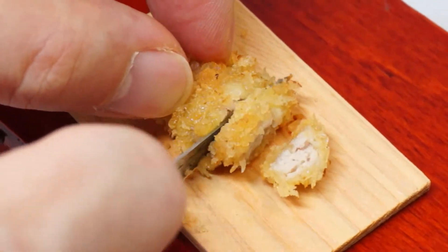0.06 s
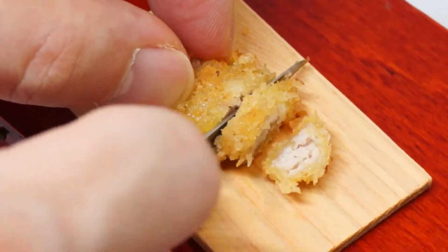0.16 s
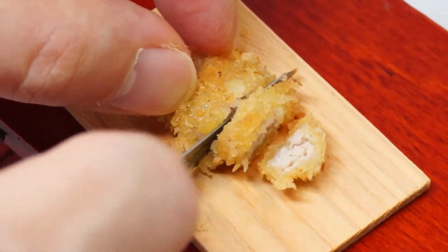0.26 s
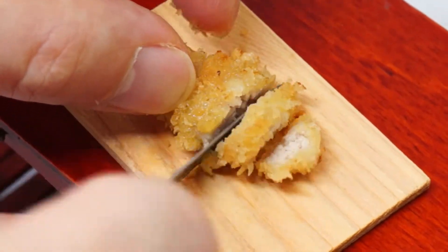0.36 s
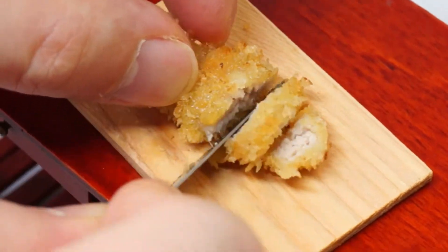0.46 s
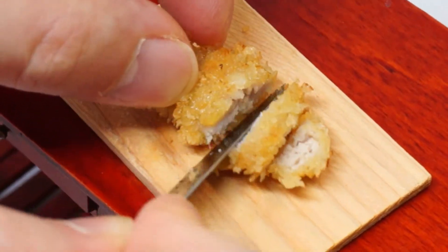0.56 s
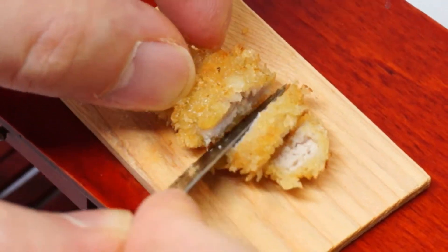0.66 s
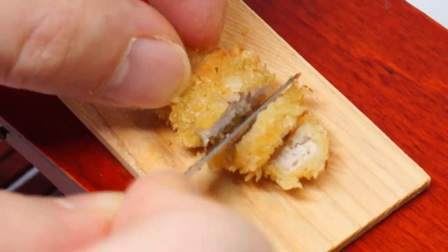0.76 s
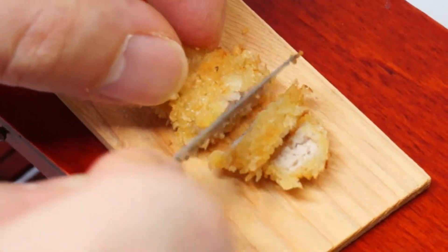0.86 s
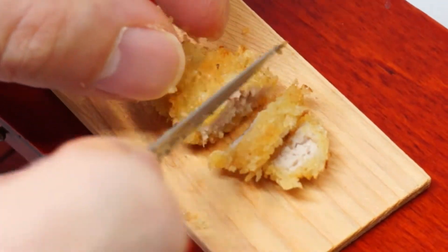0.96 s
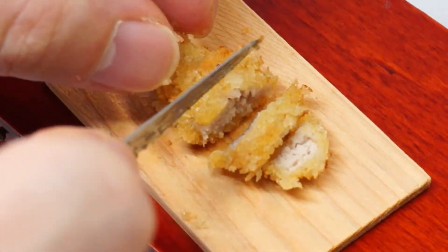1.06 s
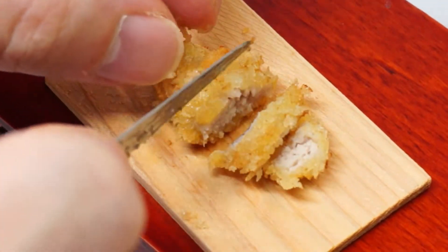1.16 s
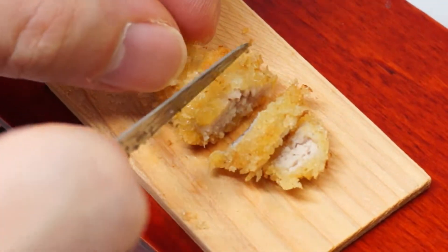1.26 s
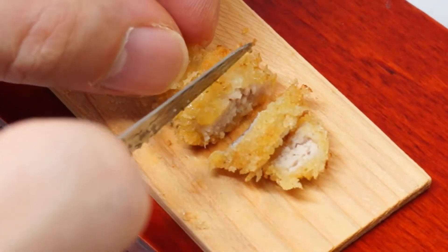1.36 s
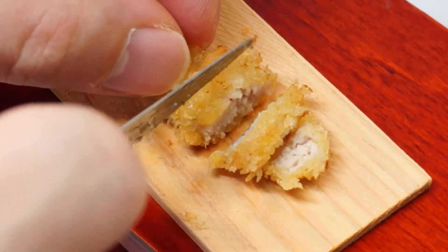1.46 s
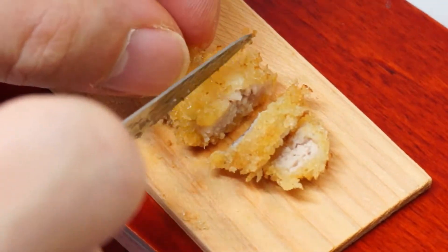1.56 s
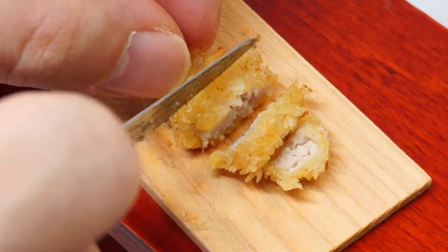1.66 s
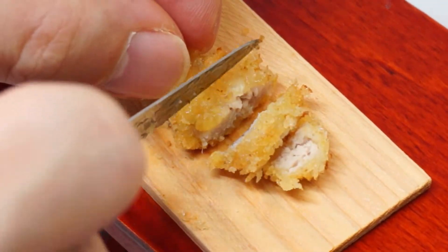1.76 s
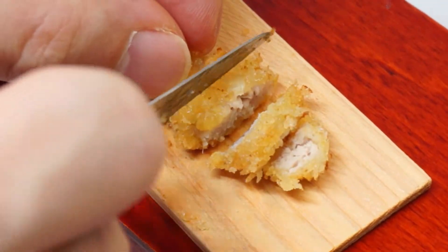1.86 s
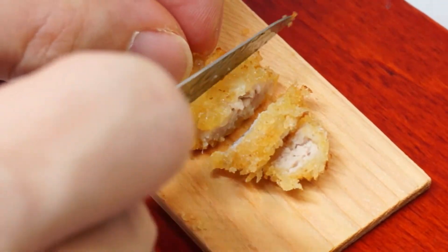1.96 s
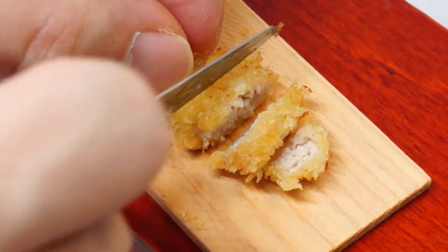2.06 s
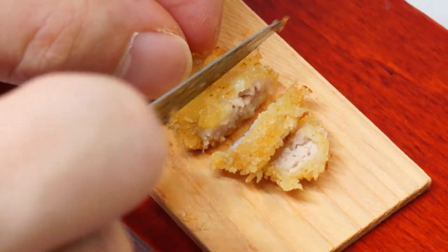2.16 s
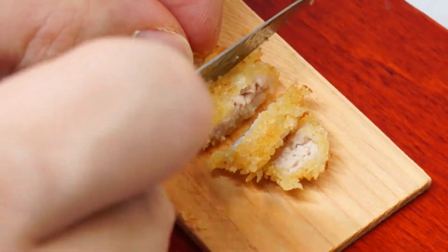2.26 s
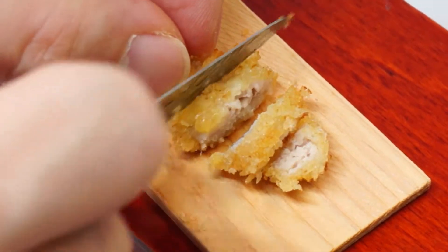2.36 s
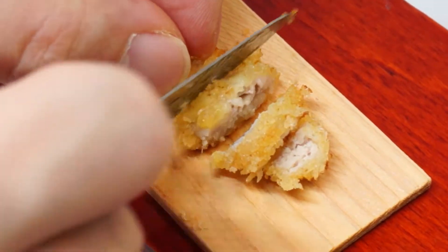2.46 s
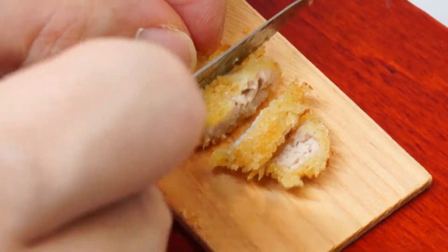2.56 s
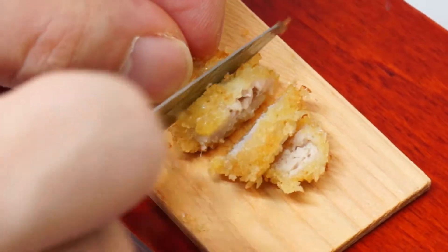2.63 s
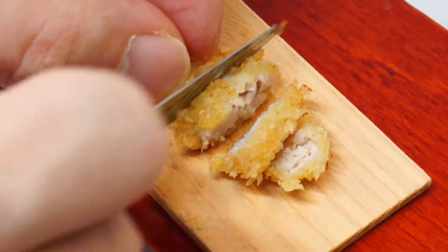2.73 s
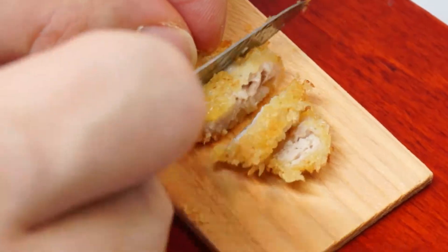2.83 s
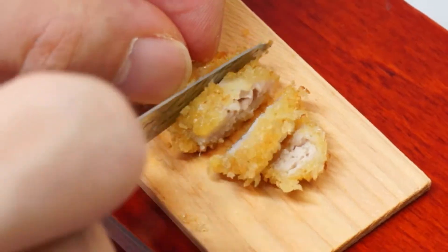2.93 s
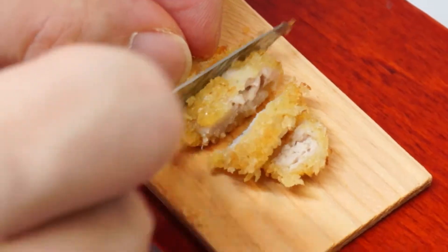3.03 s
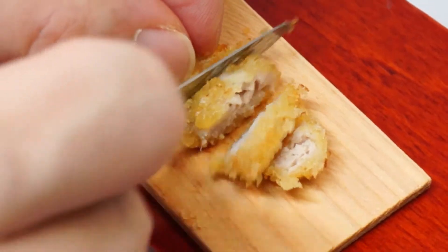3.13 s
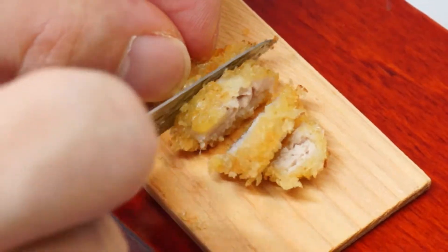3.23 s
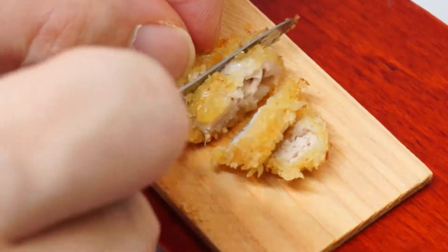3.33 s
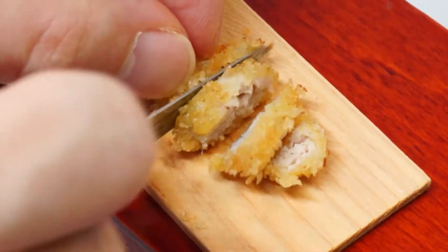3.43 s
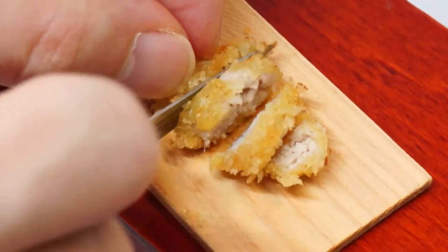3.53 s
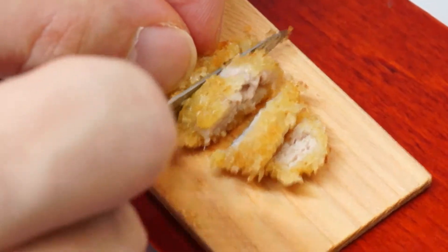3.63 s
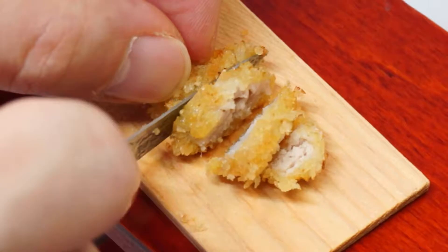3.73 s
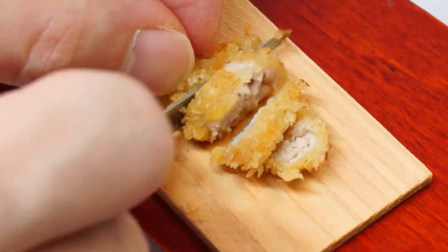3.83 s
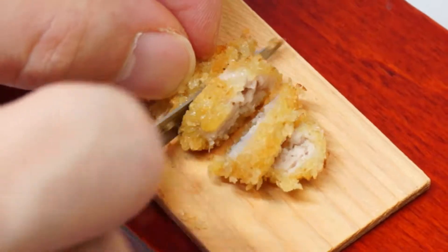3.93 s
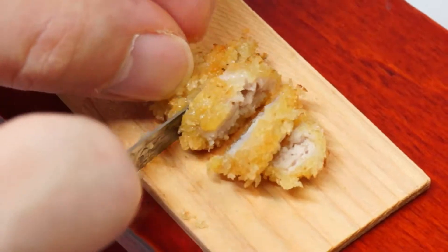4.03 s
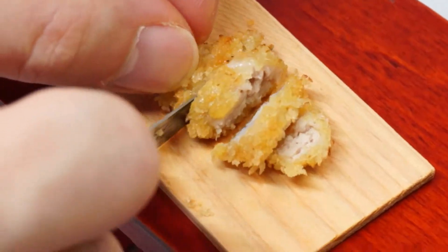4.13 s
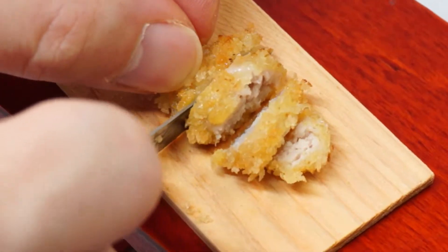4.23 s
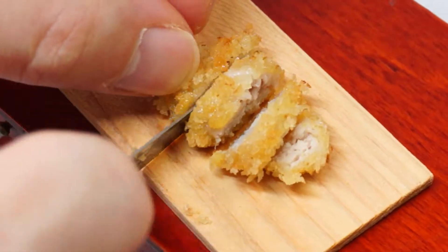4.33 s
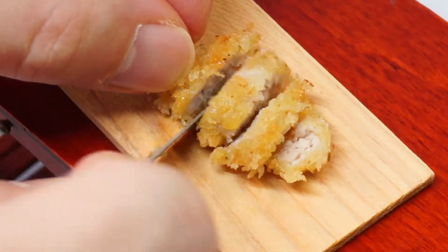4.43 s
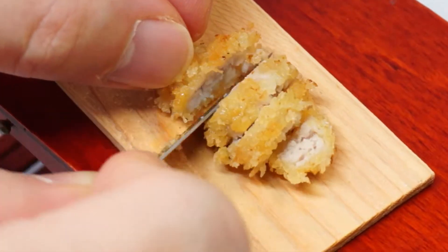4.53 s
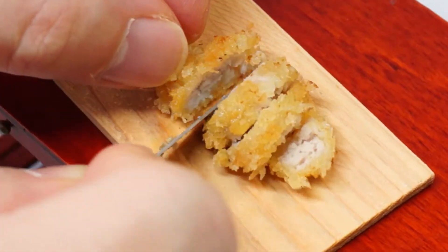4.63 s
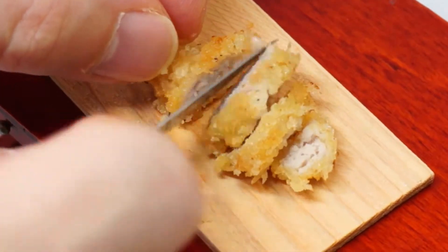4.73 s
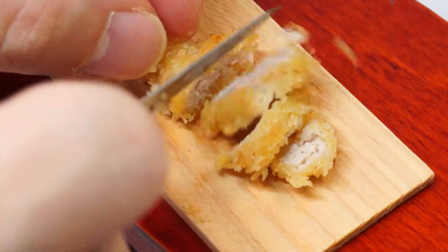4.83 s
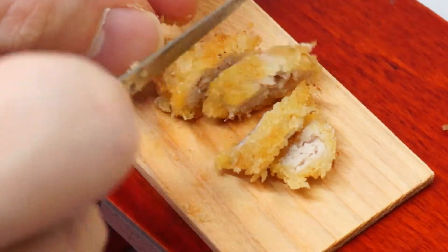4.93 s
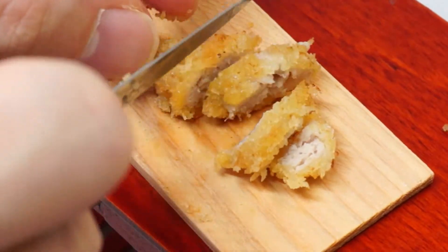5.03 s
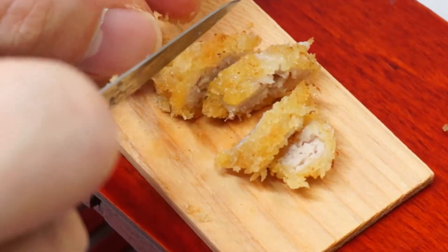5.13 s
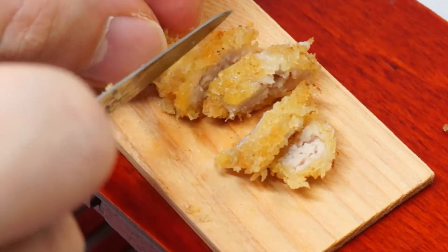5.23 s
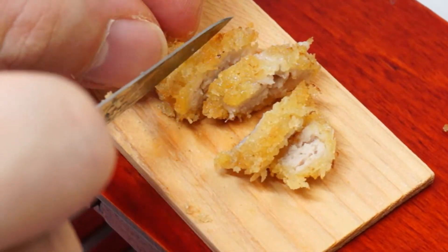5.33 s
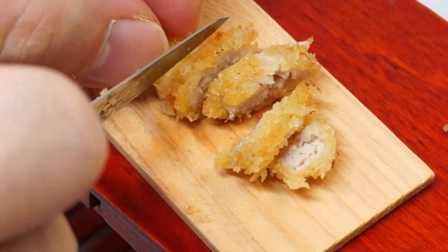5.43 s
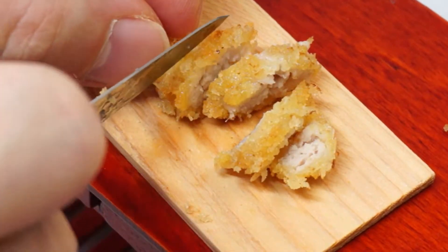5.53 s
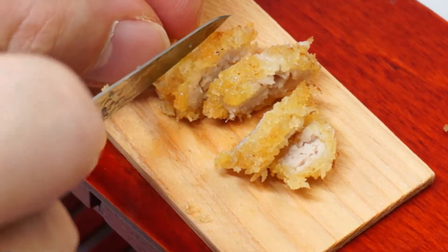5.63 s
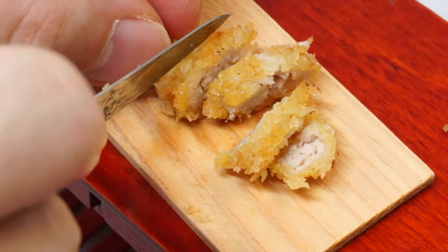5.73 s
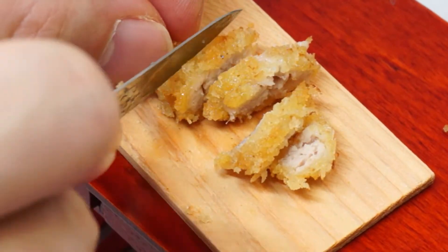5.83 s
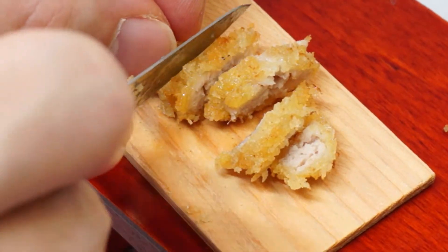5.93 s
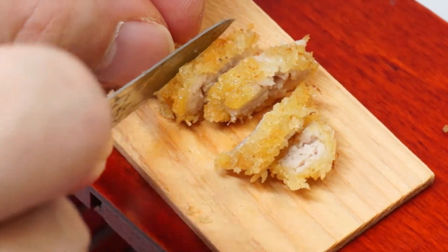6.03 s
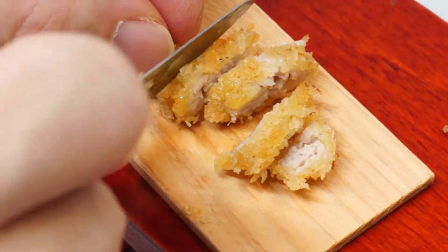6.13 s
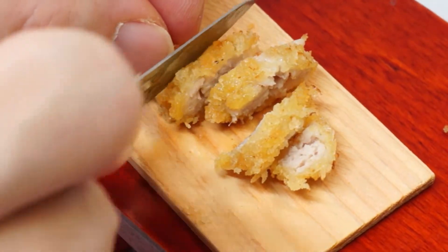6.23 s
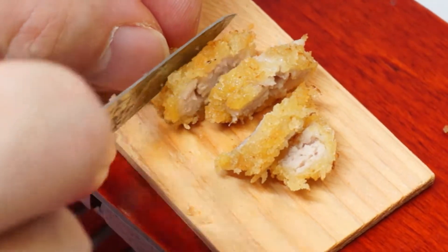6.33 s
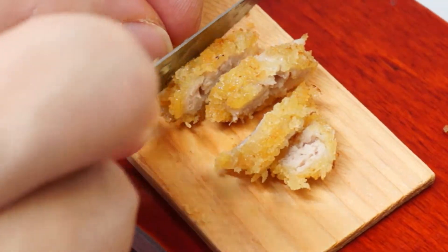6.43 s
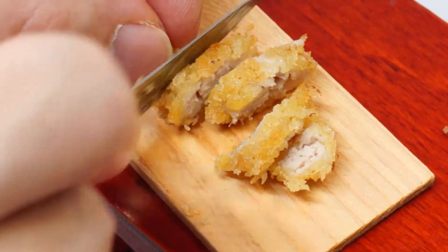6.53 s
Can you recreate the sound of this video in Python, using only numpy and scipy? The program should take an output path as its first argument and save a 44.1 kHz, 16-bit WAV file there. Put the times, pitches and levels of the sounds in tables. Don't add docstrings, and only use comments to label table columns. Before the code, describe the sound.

A crisp crunch, then a tiny knife saws through a brittle fried crust with crackles, flaky ticks and dull wooden board knocks over a quiet room hum.

```python
import sys
import numpy as np
from scipy import signal
from scipy.fft import rfft, irfft
from scipy.io import wavfile
from scipy.ndimage import uniform_filter1d

SR = 44100
rng = np.random.default_rng(int(sys.argv[2]) if len(sys.argv) > 2 else 0)


def magnitude_from_level(level_db):
    exponent = np.asarray(level_db, float) / 20
    return 10 ** exponent


def waveform_to_disk(signal):
    frames = np.transpose(np.atleast_2d(signal))
    scaled = np.clip(frames, -1, 1) * 32767
    samples = np.round(scaled).astype(np.int16)
    wavfile.write(sys.argv[1], SR, samples)


N = 290178

# (frequency [Hz], level [dB], t60 [s])
TABLE_MODES = [(138.2, -8, 0.14), (165, -6.5, 0.064), (205, -6.5, 0.1), (312, -8, 0.039)]
# (frequency [Hz], level [dB], t60 [s])
BOARD_MODES = [(342, 9, 0.027), (498.5, 9.5, 0.017), (568, 7, 0.013), (735, -1, 0.03), (865, 2.5, 0.027),
               (1060, -4.5, 0.0091), (1444, -1, 0.013), (1736, -8, 0.023), (2046, -10.5, 0.022),
               (2760, -15, 0.014), (3600, -8.5, 0.033)]
# (frequency [Hz], side minus mid [dB])
STEREO_WIDTH = [(60, -30), (110, -12.5), (200, -15), (380, -1.5), (700, -2.5), (1290, -0.5), (2380, -2),
                (4400, -5), (8120, -18), (15000, -76)]
# (time [s], length [s], flake level [dB], crumb level [dB re flakes])
BITE_RUNS = [(.272, .016, -41.5, -2.5), (0.362, .025, -46.5, -5), (1.889, 0.0025, -43, -16),
             (2.001, 0.053, -52, -7), (2.212, .05, -44.5, -6), (2.309, .06, -45, -6),
             (2.481, .038, -46, -12), (2.558, .024, -42, -9), (2.628, .006, -42, -8),
             (2.69, .018, -45.5, -3), (2.853, .025, -47, -8), (2.963, .022, -39.5, -4),
             (3.055, 0.0051, -39, 0.5), (3.31, .035, -55, -21), (3.376, .034, -47.5, -9),
             (3.491, .06, -51, -17), (3.879, 0.1, -41, -19), (3.964, .018, -39, -3),
             (4.055, .006, -47, -11), (4.125, .006, -46, 0), (4.249, .015, -54, -1),
             (4.528, 0.025, -40.5, -6.5), (4.597, .01, -50, -12), (4.736, .003, -50, -10),
             (4.9, .02, -53, -5), (5.37, .003, -48, -2), (5.715, .035, -53.5, -2),
             (5.931, .003, -38.5, -8.5), (6.416, 0.041, -44.5, -8), (6.467, .006, -40.5, -2)]
# (time [s], level [dB], hardness [dB rel], rebound delay [s], rebound level [dB])
BOARD_STROKES = [
    (2.902, -18, -11, 0.072, -24),
    (3.17, -20, -7, 0.078, -25),
    (3.406, -20.5, -7.5, .088, -25.5),
    (3.692, -26, -5.5, .068, -26.5),
    (3.950, -26.5, -8, .073, -24),
    (4.193, -21, -7, .04, -30),
]


def level(x, db):
    return x * magnitude_from_level(db) / np.sqrt(np.mean(x ** 2))


def peak(x, hz, width):
    return signal.lfilter(*signal.iirpeak(hz, hz / width, fs=SR), x)


def body(x, peaks):
    return sum((-1) ** k * magnitude_from_level(db) * peak(x, hz, width) for k, (hz, width, db) in enumerate(peaks))


def ring(x, hz, t60):
    pole = np.exp(2j * np.pi * hz / SR - np.log(1000) / (t60 * SR))
    return signal.lfilter([1], [1, -pole], x).imag


def colour(x, points):
    hz, db = np.transpose(points)
    f = np.maximum(np.fft.rfftfreq(N, 1 / SR), 1)
    return irfft(rfft(x) * magnitude_from_level(np.interp(np.log(f), np.log(hz), db)), N)


def walk(rate):
    k = int(SR / rate)
    held = np.repeat(rng.standard_normal(N // k + 1), k)
    return uniform_filter1d(uniform_filter1d(held, k), k)[:N]


def add(out, s, x):
    i = int(s * SR)
    out[i:i + len(x)] += x[:N - i]


def background():
    # (frequency [Hz], level [dB rms])
    motor_lines = [(301.5, -60.5), (398.4, -60.5), (441.4, -46.5), (489.9, -88), (597.5, -70), (899.0, -75),
                   (1669, -75.5), (3483, -76.5), (3725, -81.5), (5276, -93)]
    # (frequency [Hz], density [dB per Hz])
    air_spectrum = [(20, -8), (60, -17.5), (150, -4.5), (300, -8.5), (357, -13.5), (434, -9.5), (542, -15),
                    (900, -24), (1220, -29.5), (1910, -34), (4180, -38), (9000, -38), (16000, -38),
                    (20000, -65)]
    # (frequency [Hz], width [Hz], level [dB rms])
    fan_bands = [(52.8, 15, -61), (3530, 590, -75), (1580, 250, -80), (5300, 99, -79)]
    t = np.arange(N) / SR
    mid = level(colour(rng.standard_normal(N), air_spectrum), -51.5) * magnitude_from_level(2.5 * walk(3.38))
    for hz, width, db in fan_bands:
        mid = mid + level(peak(peak(rng.standard_normal(N), hz, width), hz, width), db)
    side = colour(np.roll(mid, N // 3), STEREO_WIDTH)
    for hz, db in motor_lines:
        waver = np.cumsum(walk(6)) / SR * 0.001933 * hz
        tone = np.sin(2 * np.pi * (hz * t + waver + rng.random()))
        mid = mid + np.sqrt(2) * magnitude_from_level(db + 0.21 * walk(14)) * tone
    return np.array([mid + side, mid - side])


def room(x):
    t60_s, onset_s, room_db = 0.3, 0.00082, -16
    t = np.arange(SR // 2) / SR
    tails = rng.standard_normal((2, len(t))) * magnitude_from_level(-60 * t / t60_s) * np.minimum(t / onset_s, 1)
    mid, side = (signal.fftconvolve(x, tail / np.sqrt(np.sum(tail ** 2)))[:N] for tail in tails)
    side = magnitude_from_level(8.5) * colour(side, STEREO_WIDTH)
    return magnitude_from_level(room_db) * np.array([mid + side, mid - side])


def rumble(db):
    shake = rng.standard_normal(N) * magnitude_from_level(3 * walk(30))
    table, board = (sum(magnitude_from_level(d) * ring(shake, f, t) for f, d, t in modes)
                    for modes in (TABLE_MODES, BOARD_MODES))
    return (level(table, -5.5) + level(board, -12.5)) * magnitude_from_level(db)


def blows():
    # (time [s], peak level [dB], hardness [dB rel], favoured table pitch [Hz])
    board_nudges = [(.025, -29.5, -14, 176), (.213, -23, -18, 148), (.278, -31.5, -21, 143),
                    (0.346, -31, -14.5, 199), (.394, -42, -21, 143), (.467, -28.5, -36.5, 140),
                    (0.586, -28.5, -18.5, 324), (.809, -35.5, -15.5, 143), (1.442, -34.5, -38, 152),
                    (1.577, -27, -22, 165), (1.887, -37, -34, 144), (2.232, -36.5, -26, 129),
                    (2.336, -32, -14.5, 328), (2.587, -30.5, -19, 288), (2.617, -29.5, -19, 186),
                    (2.696, -28, -18, 133), (2.853, -34, -22, 208), (3.858, -29, -21, 146),
                    (4.108, -32, -11.5, 205), (4.736, -42.5, -4, 322), (5.39, -35, -25.5, 160),
                    (5.696, -31.5, -17, 154), (5.845, -30.5, -18, 206), (5.932, -30.5, -17.5, 136),
                    (6.454, -30.5, -29, 198)]
    strokes = [(s, db, hard_db, 176.5) for s, db, hard_db, *_ in BOARD_STROKES]
    rebounds = [(s + after, db, -13.5, 158) for s, *_, after, db in BOARD_STROKES]
    return strokes + rebounds + list(board_nudges)


def knocks():
    lag_cycles, board_lag_s = 0.45, 0.00298
    chatter_db, chatter_t60_s = -33.5, 0.22
    out, silence, time = np.zeros(N), np.zeros(8192), np.arange(8192) / SR
    push, edge = (np.r_[w / w.sum(), silence][:8192] for w in (np.hanning(60), np.hanning(9)))
    for s, db, hard_db, hz in blows():
        weight = magnitude_from_level(1.5 * rng.standard_normal(16))
        detune = 1 + .025 * rng.standard_normal(16)
        rattle = uniform_filter1d(rng.standard_normal(8192), size=10)
        chatter = rattle * magnitude_from_level(chatter_db - 60 * time / chatter_t60_s)
        table_push = push + 0.55 * chatter
        for k, (f, d, t) in enumerate(TABLE_MODES):
            favour_db = 5 * np.exp(-(np.log(f / hz) / 0.18) ** 2)
            gain = magnitude_from_level(db + d + favour_db + 1.0) * weight[k]
            add(out, s + lag_cycles / f, gain * ring(table_push, f, t))
        board_blow = magnitude_from_level(min(hard_db + 9, 0)) * edge + magnitude_from_level(1.5) * chatter
        for k, (f, d, t) in enumerate(BOARD_MODES):
            gain = (-1) ** k * magnitude_from_level(db + hard_db + d - 1.0) * weight[k + 5]
            add(out, s + board_lag_s + lag_cycles / f, gain * ring(board_blow, f * detune[k], t))
    return out


def slides():
    # (time [s], length [s], frequency [Hz], width [Hz], level [dB])
    blade_rubs = [
        (.217, .03, 1450, 600, -53),
        (.351, .055, 1200, 900, -58.5),
        (.017, .041, 1200, 195, -54),
        (2.71, .088, 12200, 3000, -56),
        (5.842, .0087, 5550, 500, -47),
    ]
    out = np.zeros(N)
    for s, length, hz, width, db in blade_rubs:
        swell = np.hanning(int(length * SR))
        hiss = peak(peak(rng.standard_normal(len(swell)), hz, width), hz, width)
        add(out, s, level(hiss, db) * swell)
    return out


def grind_db(saw_db):
    bite_db, tail_s = -15.5, 0.025
    power = magnitude_from_level(2 * saw_db)
    for s, length, db, _ in BITE_RUNS:
        add(power, s, magnitude_from_level(2 * (db + bite_db)) * np.hanning(int((length + tail_s) * SR)))
    return 10 * np.log10(power)


def swarm(db, rate=1500, spread_db=2.5):
    size_db = spread_db * rng.exponential(size=N) + 2 * walk(45)
    hits = (rng.random(N) < rate / SR) * magnitude_from_level(size_db)
    decay = magnitude_from_level(-60 / (0.012 * SR))
    shower = signal.lfilter([1], [1, -decay], hits ** 2) ** .5
    return level(shower * rng.standard_normal(N), 0) * magnitude_from_level(db)


def fracture(t60, settle_db, settle_t60):
    t = np.arange(4096) / SR
    x = rng.standard_normal(4096) * (magnitude_from_level(-60 * t / t60) + magnitude_from_level(settle_db - 60 * t / settle_t60))
    x[0] = 8.5
    return x


def breaks():
    # (time [s], thick crumb level [dB], thin flake level [dB], flake pitch [Hz])
    crust_cracks = [(.03, -33.5, -21, 9300), (2.101, -50, -34, 11500), (2.2243, -34, -42, 5600),
                    (2.3274, -46, -34, 11600), (2.336, -49, -34, 9900), (2.4915, -46, -39, 8750),
                    (2.5801, -45, -39, 8400), (2.6195, -33, -36.5, 9030), (2.6933, -39, -53, 5300),
                    (2.8894, -42, -42, 9600), (2.9836, -38, -34, 15200), (3.195, -31, -25, 11100),
                    (3.2195, -37.5, -50.5, 6700), (3.4188, -39, -34.5, 11700), (3.4419, -43, -37, 10900),
                    (3.4506, -43, -33, 8300), (2.8804, -58, -40, 9800), (3.9487, -44, -28.5, 11700),
                    (3.9714, -41.5, -37, 9900), (4.0117, -33, -29, 11700), (4.019, -34, -25.5, 11700),
                    (4.0735, -35, -34, 8160), (4.0892, -29.5, -36, 9100), (4.097, -34, -38, 13400),
                    (4.1062, -25, -31.5, 8400), (5.3966, -41, -37.5, 11400), (5.9555, -36, -30.5, 15800),
                    (6.38, -42.5, -36, 7600), (6.4092, -38.5, -31.5, 8730), (6.45, -39.5, -37, 9000)]
    # (time [s], level [dB], pitch [Hz])
    flake_ticks = [(0.34, -46, 10100), (.6726, -46.5, 11700), (.707, -45, 8800), (0.7608, -43, 8600),
                   (0.8065, -49.5, 12900), (1.4438, -46, 13400), (1.5315, -41, 10840), (1.5772, -47, 11700),
                   (1.6878, -43, 13900), (2.923, -44.5, 11700), (3.292, -43, 14300), (3.351, -48, 15300),
                   (3.6684, -47, 14400), (3.7594, -46, 11300), (3.8322, -44, 8400), (4.2138, -40.5, 8500),
                   (4.3437, -48.5, 14100), (4.507, -43, 8250), (2.0555, -43, 7500), (4.74, -44.5, 8700),
                   (4.8157, -50.5, 7760), (5.6142, -48, 12600), (5.7, -40.5, 5300), (5.8448, -42, 5670),
                   (6.0524, -39, 5870), (6.1717, -45, 8750), (6.2314, -38, 7460), (6.2913, -46, 8950),
                   (6.3269, -42.5, 10800), (6.5303, -47, 8860)]
    stray_times = [4.7036, .433, .52, .621, .9004, 1.596, 1.6704, 1.7601, 1.8417, 1.9449, 2.424, 2.7689,
                   3.0476, 3.2455, 3.64, 3.71, 4.637, 4.7615, 4.995, 4.522, 5.34, 5.81, 5.88, 5.91, 6.0063,
                   6.0677, 6.1255, 6.2523, 6.51]
    crumb_db, crumb_db_per_octave = -6, -3.5
    edge_lag_s, edge_db = .0035, -26
    stray_db, stray_hz = -55.5, 11500
    gap_s, scatter_db, flake_hz, flake_spread = .009, 3.5, 10800, .22
    rows = list(crust_cracks)
    for s, db, hz in flake_ticks:
        rows.append((s, db + crumb_db + crumb_db_per_octave * np.log2(hz / 5500), db, hz))
    rows += [(s + edge_lag_s, db + edge_db, db + edge_db - 2, 5700) for s, db, *_ in BOARD_STROKES]
    rows += [(s, stray_db + 2 * crumb_db, stray_db, stray_hz) for s in stray_times]
    for s, length, db, bite_crumb_db in BITE_RUNS:
        gap = gap_s * (.4 + 1.2 * rng.random(10))
        chance = rng.standard_normal((3, 10))
        after = np.cumsum(gap) - gap[0]
        size_db = db - 2.5 + scatter_db * chance[0] - 1e4 * np.maximum(after - length, 0)
        hz = np.minimum(flake_hz * np.exp(flake_spread * chance[2]), 15500)
        rows += zip(s + after, size_db + bite_crumb_db + scatter_db * chance[1], size_db, hz)
    return rows


def snaps():
    settle_db = -20
    thick, thin = np.zeros(N), np.zeros(N)
    for s, thick_db, thin_db, hz in breaks():
        add(thick, s, magnitude_from_level(thick_db) * fracture(t60=.02, settle_db=settle_db, settle_t60=.2))
        flake = fracture(t60=.011, settle_db=settle_db, settle_t60=.18)
        add(thin, s, magnitude_from_level(thin_db) * (flake + 2.2 * peak(flake, hz, 1500)))
    return magnitude_from_level(-1.0) * thick, magnitude_from_level(-3.5) * thin


def scene():
    # (time [s], fine crackle level [dB], table rumble level [dB])
    saw_course = [(0, -51, -39.5), (.16, -62.5, -44.5), (.6, -68.5, -46), (1.3, -80, -62),
                  (2.0, -73, -54.5), (2.42, -63, -51), (2.67, -64, -47), (3.08, -64, -43.5),
                  (3.24, -55, -37.5), (3.36, -66.5, -47), (3.8, -65, -41), (4.1, -51, -40),
                  (4.2, -63, -39.5), (4.62, -66.5, -48), (4.82, -71, -53), (5.75, -74, -53),
                  (5.95, -66.5, -52.5), (6.58, -59.5, -43.5)]
    # (frequency [Hz], width [Hz], level [dB])
    thick_modes = [(2815, 264, 5.5), (3614, 420, 7.5), (4460, 330, 7), (5650, 860, 4.5)]
    # (frequency [Hz], width [Hz], level [dB])
    thin_modes = [(6410, 2220, 2.5), (8400, 3270, 6.5), (9670, 2180, 7.5), (11700, 2190, 3.5),
                  (13840, 3050, 1), (16200, 1100, -3.5)]
    # (frequency [Hz], level [dB], t60 [s])
    blade_modes = [(1715, -36, 0.066), (2385, -32.5, 0.015)]
    s, *columns = np.transpose(saw_course)
    fine_db, table_db = (np.interp(np.arange(N) / SR, s, c) for c in columns)
    thick, thin = snaps()
    fine = magnitude_from_level(3.5) * swarm(grind_db(fine_db))
    thick, thin = thick + fine, thin + fine
    blade = sum(magnitude_from_level(db) * ring(thick, hz, t60) for hz, db, t60 in blade_modes)
    radiation = signal.butter(4, 2200, "high", fs=SR, output="sos")
    crumbs = signal.sosfilt(radiation, body(thick, thick_modes) + body(thin, thin_modes))
    crust = crumbs + blade + slides()
    bass_cut = signal.butter(4, 122, "high", fs=SR, output="sos")
    wood = signal.sosfilt(bass_cut, knocks() + rumble(table_db))
    lean = .12 * walk(25)
    return crust * np.array([1 + lean, 1 - lean]) + wood + room(crust + wood) + background()


def roll_off(x):
    return signal.sosfilt(signal.butter(12, 16970, fs=SR, output="sos"), x)


def record(dry):
    top_cut = signal.ellip(8, .3, 40, 15900, fs=SR, output="sos")
    mix = signal.sosfilt(top_cut, dry)
    return roll_off(mix)


dry = scene()
out = record(dry)
waveform_to_disk(out)
```